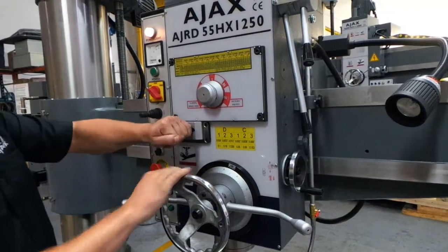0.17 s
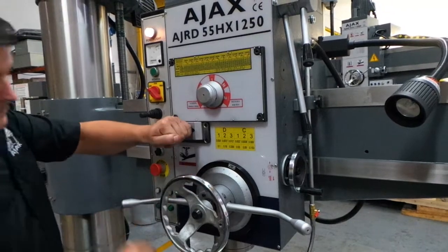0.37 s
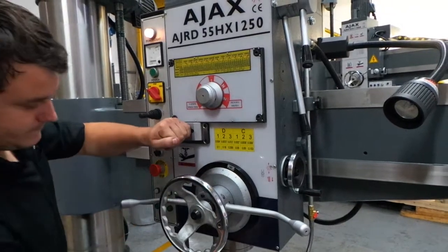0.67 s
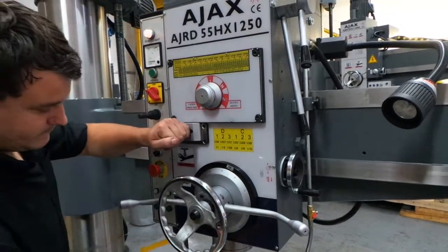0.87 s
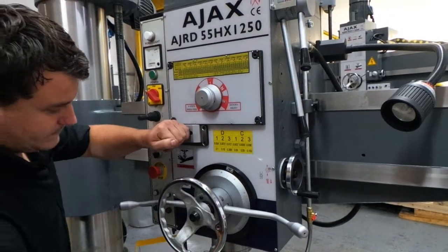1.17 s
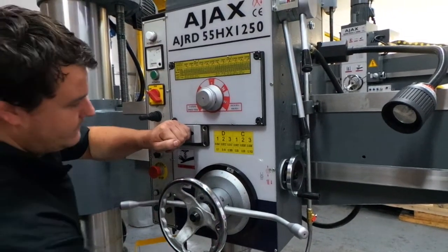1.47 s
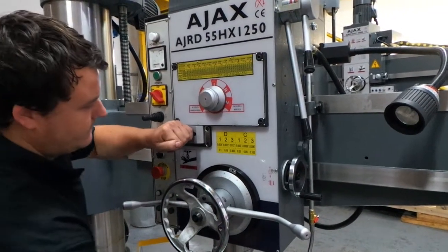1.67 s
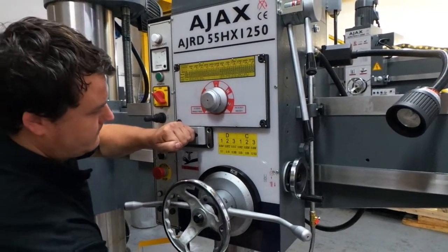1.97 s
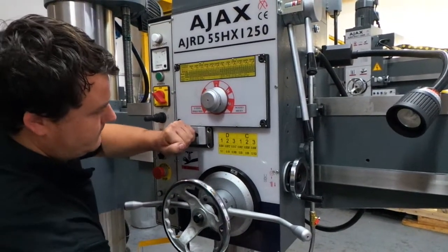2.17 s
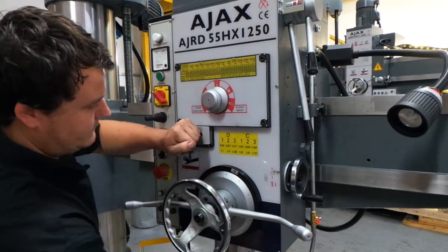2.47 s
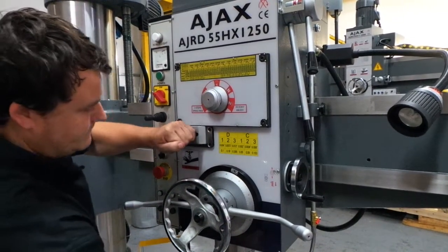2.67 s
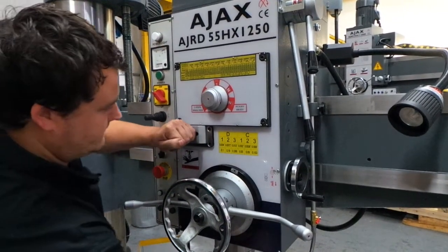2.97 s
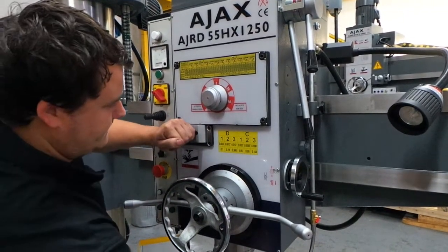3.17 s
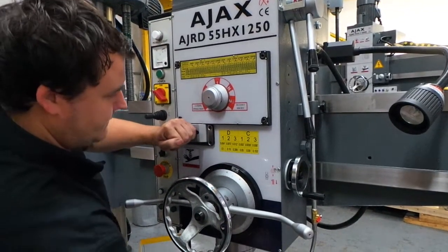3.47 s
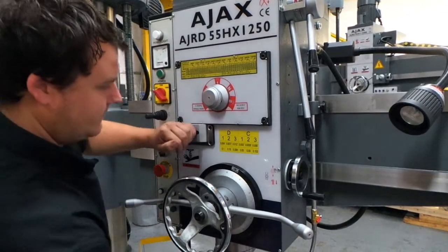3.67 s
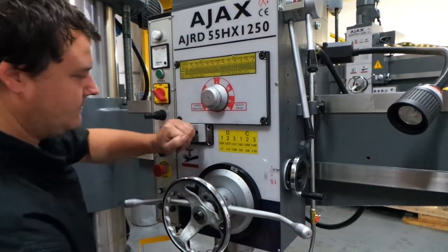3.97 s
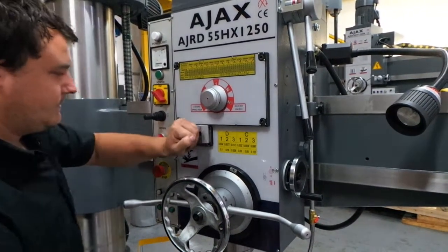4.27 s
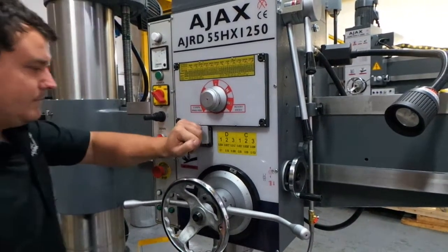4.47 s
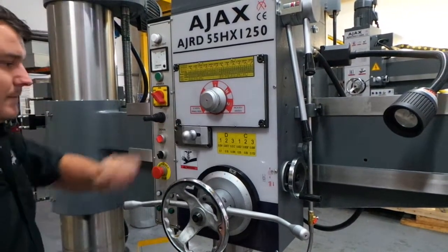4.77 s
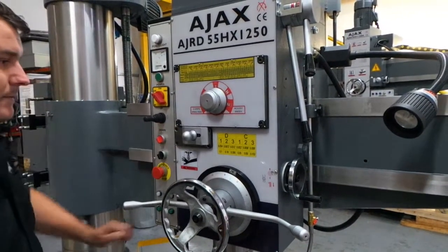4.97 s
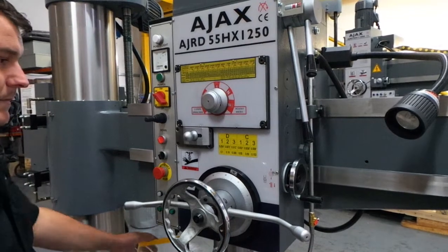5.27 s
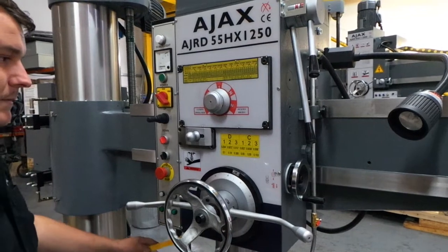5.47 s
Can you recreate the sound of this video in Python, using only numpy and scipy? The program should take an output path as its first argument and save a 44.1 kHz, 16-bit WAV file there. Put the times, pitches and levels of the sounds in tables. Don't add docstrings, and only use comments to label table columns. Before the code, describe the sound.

A large workshop hall with a faint, steady hiss of fans and pumps throughout. At 0 s the echo of a clack just before the start is dying away. From 0.8 to 1.15 s a cluster of dull, woody knocks and scuffs tumbles by, with small rough ticks and a very faint high jingle of loose steel around 1.0 s, cut by 1.3 s. Crisp catch ticks and grip nudges come at 1.7 s, more from 2.0 to 2.26 s. At 2.3 s a hard, bright steel snap bounces briefly; at 2.63 s a duller, weightier gear clunk follows. Each is very short, with over a second of dense hall echo. Faint metallic singing appears at 3.15 to 3.5 s, ticks at 3.65 s. Ticks at 4.12 s lead into a second sharp snap at 4.17 s and its echo. Weak bumps at 4.85 s, then soft board knocks around 5.43 s. Close single microphone, centred.

```python
import sys
import numpy as np
from scipy import signal
from scipy.fft import rfft, irfft, next_fast_len
from scipy.io import wavfile
from scipy.ndimage import uniform_filter1d

SR = 44100
rng = np.random.default_rng(int(sys.argv[2]) if len(sys.argv) > 2 else 0)


def wrap_up_sound(samples):
    columns = np.atleast_2d(samples).T
    tamed = np.clip(columns, -1, 1)
    steps = np.round(tamed * 32767).astype(np.int16)
    wavfile.write(sys.argv[1], SR, steps)


def elevation(decibels):
    levels = np.asarray(decibels, float)
    return 10 ** (levels / 20)


N = 247070
LEAD_S = 0.4
LEAD = round(LEAD_S * SR)
M = N + LEAD
SIZE = next_fast_len(M + 2 * SR)
HZ = np.maximum(np.arange(SIZE // 2 + 1) * SR / SIZE, 1)
SHORT = 2 ** 14
SHORT_HZ = np.maximum(np.arange(SHORT // 2 + 1) * SR / SHORT, 1)


def rms_one(x):
    return x / np.sqrt(np.mean(x ** 2) + 1e-20)


def at_hz(points, hz):
    table = np.array(points)
    return np.interp(np.log(hz), np.log(table[:, 0]), table[:, 1])


def in_time(rows):
    return np.interp(np.arange(M) / SR - LEAD_S, *np.transpose(rows))


def band(x, low_hz, high_hz, order=2):
    return signal.sosfilt(signal.butter(order, [low_hz, high_hz], "band", fs=SR, output="sos"), x)


def ring(clicks, hz, t60):
    decay = elevation(-60 / (t60 * SR))
    turn = 2 * np.pi * hz / SR
    return signal.lfilter([0, np.sin(turn)], [1, -2 * decay * np.cos(turn), decay ** 2], clicks + 1e-18)


def burst(length_s, rise):
    t = np.arange(SR // 4) / SR / max(length_s, 1e-4)
    contacts = rng.standard_normal(len(t)) * rng.exponential(1, len(t))
    grains = contacts * (1 - np.exp(-t / rise)) * np.exp(-2 * t)
    return grains / np.sqrt(np.sum(grains ** 2))


def add(out, s, sound):
    at = round(s * SR) + LEAD
    out[at:at + len(sound)] += sound[:len(out) - at]


# (frequency [Hz], level per Hz [dB])
PLANT_COLOUR = [(12, -49.5), (20, -15), (103, -3.5), (128, -8.5), (189, -0.5), (337, -8.5), (387, -8),
                (555, -8.5), (638, -7.5), (733, -9), (1140, -7.5), (2160, -3.5), (3180, -20), (11700, -31),
                (15000, -34)]
# (time [s], level [dB])
PLANT_LEVEL = [(0, -54), (1.2, -55), (1.5, -57.5), (1.9, -53), (3.2, -52.5), (3.9, -54), (5.6, -55)]


def plant():
    spectrum = rfft(rng.standard_normal(SIZE)) * elevation(at_hz(PLANT_COLOUR, HZ))
    noise = irfft(spectrum, SIZE)[:M]
    return elevation(in_time(PLANT_LEVEL)) * rms_one(noise)


# (frequency [Hz], time [s])
HALL_DECAY = [(100, 1.22), (250, 0.98), (500, 1.26), (1000, 1.27), (2000, 1.14), (4000, 1.174),
              (7000, 1.05), (12000, 0.45)]


def hall():
    build_s = 0.002
    linger_db, linger_times = -23.5, 2.6
    t = np.arange(2 * SR) / SR
    white = rng.standard_normal((2, len(t)))
    edges_hz = 30 * 2 ** np.arange(0, 9.6, 0.5)
    out = np.zeros(len(t))
    for k, (low, high) in enumerate(zip(edges_hz, edges_hz[1:])):
        fall_db = -60 * t / at_hz(HALL_DECAY, np.sqrt(low * high))
        fall = np.hypot(elevation(fall_db), elevation(linger_db + fall_db / linger_times))
        out += band(white[k % 2], low, high) * fall
    return rfft(out * (1 - np.exp(-t / build_s)), SIZE)


# (frequency [Hz], width [Hz], level [dB])
JINGLE_NOTES = [(5580, 80, 2), (6400, 200, -1), (8877, 110, 2), (9636, 130, -8), (11040, 120, -14),
                (12600, 500, -6), (13510, 130, -6)]


def jingle():
    peak_s, stop_s, top_db = 1.035, 1.32, -68
    rise_db_per_s, fall_db_per_s, stop_db_per_s = 200, 60, 300
    white = rng.standard_normal(M)
    lines = elevation(0.5) * rms_one(band(white, 4500, 14000))
    for hz, width_hz, db in JINGLE_NOTES:
        t60 = 2.2 / width_hz
        lines += elevation(db) * rms_one(ring(ring(white, hz, t60), hz, t60))
    t = np.arange(M) / SR - LEAD_S
    shake_db = top_db - np.maximum(rise_db_per_s * (peak_s - t), fall_db_per_s * (t - peak_s))
    return elevation(shake_db - stop_db_per_s * np.maximum(t - stop_s, 0)) * lines


# (time [s], peak level [dB], pitch [Hz])
ROUGH_TICKS = [(0.859, -45, 2330), (0.9175, -39, 2900), (0.928, -36, 2020), (0.971, -49, 2000),
               (1.0744, -48, 1670), (1.52, -54, 2200), (4.1222, -30, 2360)]
# (time [s], peak level [dB], pitch [Hz])
CLEAR_TICKS = [(1.6915, -27.5, 2650), (1.6975, -33, 2750), (1.7074, -39, 2940), (1.776, -45, 1750),
               (2.2531, -30, 2220), (2.2577, -24, 2360), (3.642, -36.5, 2563), (3.655, -42, 1670),
               (4.113, -40, 1900), (4.118, -35, 2370)]
# (time [s], peak level [dB], pitch [Hz])
SLIDING_TICKS = [(.875, -43, 1400), (.94, -41, 1700), (1.0, -44, 1600), (1.7, -43, 1900), (2.02, -32, 1800),
                 (5.429, -45, 1500)]
# (time [s], level [dB], pitch [Hz], length [s])
SINGING_PART = [(2.095, -43.5, 1150, 0.014), (2.115, -39, 1150, 0.019), (3.155, -37, 1155, 0.079),
                (3.40, -44, 1152, 0.034), (3.435, -42, 1144, .03), (3.5, -46, 1170, 0.035)]
# (times its pitch [ratio], level [dB])
TICK_OVERTONES = [(1.45, -15), (2.05, -14)]


def ticks():
    out = np.zeros(M)
    # (table, length [s], edge level [dB], edge top [Hz], share of length spent swelling)
    kinds = [(ROUGH_TICKS, 0.004, 23, 4600, 0.04),
             (CLEAR_TICKS, 0.004, 11.3, 4600, 0.04),
             (SLIDING_TICKS, 0.016, 23.5, 2100, 0.8)]
    for rows, length_s, edge_db, edge_hz, rise in kinds:
        for s, peak_db, hz in rows:
            edge = band(burst(3.5 * length_s, rise), 900, edge_hz, order=1)
            touch = burst(length_s, rise)
            note = ring(touch, hz, 0.012)
            for times, db in TICK_OVERTONES:
                note += elevation(db) * ring(touch, times * hz, 0.013)
            add(out, s, elevation(peak_db + 0.5) * band(note + elevation(edge_db) * edge, 580, 6200))
    for s, db, hz, length_s in SINGING_PART:
        song = ring(burst(length_s, 0.4), hz, 0.08)
        add(out, s, elevation(db) * band(song, 0.64 * hz, 1.1 * hz))
    return out


# (time [s], peak level [dB], pitch [Hz])
BOARD_KNOCKS = [(0.788, -33, 790), (0.807, -38, 324), (0.864, -28, 700), (0.890, -22.5, 540),
                (0.926, -19.5, 536), (0.930, -27, 800), (0.948, -32, 304), (0.964, -29, 760),
                (1.019, -35, 826), (1.061, -25, 620), (1.087, -33, 310), (1.134, -44, 301),
                (5.419, -35, 780), (5.439, -29, 525), (5.452, -41, 298), (5.539, -45, 802)]
# (time [s], peak level [dB], pitch [Hz])
GRIP_NUDGES = [(1.694, -27.5, 500), (1.698, -32, 1050), (1.718, -31, 495), (1.78, -44, 509),
               (1.957, -45.5, 503), (2.046, -29, 600), (2.058, -31, 300), (2.10, -38, 480),
               (2.136, -39, 471.5), (2.169, -33, 240), (2.256, -33, 1074), (4.1125, -32, 1300),
               (4.124, -32, 503), (4.839, -39.5, 280), (4.895, -37, 207)]
# (frequency [Hz], level [dB], time to drop 60 dB [s])
BOARD_MODES = [(118, -10, .07), (190.5, -5, 0.077), (260, -7.5, 0.063), (306, -2.5, 0.13),
               (395, -11.5, 0.023)]


def knocks():
    out = np.zeros(M)
    boom_lag = 0.3
    # (table, length [s], boom level [dB])
    for rows, length_s, boom_db in [(BOARD_KNOCKS, 0.022, -4.5), (GRIP_NUDGES, 0.014, -10.5)]:
        for s, peak_db, hz in rows:
            scuff = burst(length_s, 0.13)
            push = burst(1.5 * length_s, 0.63)
            cluster = ring(scuff, hz, 0.043) - 0.52 * ring(scuff, 1.4 * hz, 0.038)
            cluster += 0.3 * ring(scuff, 1.9 * hz, 0.025) - 0.5 * ring(scuff, 0.64 * hz, 0.023)
            rubbing = band(burst(2.2 * length_s, 0.15), 400, 1200, order=1)
            boom = np.zeros(len(push))
            for j, (mode_hz, db, t60) in enumerate(BOARD_MODES):
                boom += (-1) ** j * elevation(db) * ring(push, mode_hz, t60)
            board_db = boom_db - boom_lag * (peak_db + 30)
            knock = cluster + elevation(24) * rubbing + elevation(board_db) * boom
            add(out, s, elevation(peak_db - 4.5) * band(knock, 80, 3000))
    return out


# (frequency [Hz], time to drop 60 dB [s], first snap [dB], gear clunk [dB], second snap [dB])
BLOCK_MODES = [(262, 0.063, -31, -5, -24.5), (475, 0.038, -28.5, -18.5, -31), (727, 0.029, -16, -9.5, -15),
               (850, 0.024, -18, -13, -17), (1084, 0.015, -14.5, -3.5, -16.5),
               (1250, 0.027, -18.5, -3.5, -11), (1450, 0.017, -9.5, -3, -7.5),
               (2020, 0.019, -10, -7, -12.5), (2393, 0.015, -3.5, -8, -0.5), (2880, 0.017, -13, -17.5, -11),
               (3220, 0.015, -16.5, -11, -19), (3700, 0.012, -21, -1, -16),
               (4570, 0.016, -16.5, -20.5, -11), (5300, .013, -24.5, -17, -20),
               (5510, 0.011, -13.5, -24, -13.5), (6540, 0.0086, -20, -17, -15.5)]


def block_ring(contact, kind):
    out = np.zeros(len(contact))
    for j, mode in enumerate(BLOCK_MODES):
        start = -elevation(-6.5) if kind == 3 else (-1) ** j
        out += start * elevation(mode[kind]) * ring(contact, mode[0], mode[1])
    return signal.lfilter([0.25, 0.5, 0.25], 1, out)


# (frequency [Hz], level per Hz [dB])
EARLIER_COLOUR = [(35, -48), (60, -22), (145, -6.5), (380, -8), (458, 1.5), (590, -6), (641, -10.5),
                  (842, -5), (1680, -15.5), (2120, -11.5), (3890, -19.5), (4410, -25), (9000, -40),
                  (11700, -70), (19800, -120)]
# (frequency [Hz], level per Hz [dB])
FIRST_SNAP_COLOUR = [(35, -48), (60, -25.5), (144, -7), (270, -17.5), (456, -1), (632, -9.5), (786, -1.5),
                     (916, -10), (1140, -2.5), (1270, -10), (1800, -9), (2290, -3.5), (3700, -14.5),
                     (4500, -13), (11000, -30), (14300, -63), (22000, -120)]
# (frequency [Hz], level per Hz [dB])
CLUNK_COLOUR = [(35, -60.5), (60, -29), (129, -7.5), (200, -13.5), (250, -1.5), (349, -9.5), (421, 0),
                (540, -6), (737, -3.5), (1520, -9.5), (1690, -14), (2260, -14), (3210, -20.5), (3870, -18),
                (8500, -35), (11000, -67), (18700, -120)]
# (frequency [Hz], level per Hz [dB])
SECOND_SNAP_COLOUR = [(35, -60.5), (60, -35), (130, -8.5), (246, -14.5), (499, -5.5), (533, -11),
                      (593, -9.5), (660, -4.5), (766, -2), (1100, -6), (1730, -7.5), (2430, -4.5),
                      (3580, -14), (4630, -11), (10000, -29.5), (13000, -64), (22000, -120)]
# (frequency [Hz], width [Hz], then the boost for each of the four clacks [dB])
CASING_MODES = [(154.3, 32, 3, 0, 6.8, 2.5), (255, 30, 2.7, 2, 2, 0), (446, 18, 7.8, 4, 8.6, 4),
                (590, 30, 4, 1, 5.5, 10.5), (722, 20, 8, 6, 6.5, 11), (805, 36, 3, 7, 5.5, 5.5),
                (1150, 38, 6.5, 4, 7.5, 2), (1476, 80, 2.3, 10.5, 3, 2.5), (2196, 170, 1.8, 3.5, 2.6, 4),
                (2393, 80, 2.2, 1.5, 3.3, 3.5), (2904, 60, 2, 5, 1.2, 5), (3945, 140, 7.2, -1, 7, 2),
                (4640, 100, 2, -0.5, 2.2, -5)]


def casing_and_hall(k, reflections):
    colours = EARLIER_COLOUR, FIRST_SNAP_COLOUR, CLUNK_COLOUR, SECOND_SNAP_COLOUR
    gain = elevation(at_hz(colours[k], SHORT_HZ))
    for hz, width_hz, *boost_db in CASING_MODES:
        gain = gain * elevation(boost_db[k] / (1 + (2 * (SHORT_HZ - hz) / width_hz) ** 2))
    cepstrum = irfft(np.log(gain), SHORT)
    cepstrum[1:SHORT // 2] *= 2
    cepstrum[SHORT // 2 + 1:] = 0
    casing = irfft(np.exp(rfft(cepstrum)))
    tail = irfft(rfft(casing, SIZE) * reflections, SIZE)[:2 * SR]
    return tail / np.sqrt(np.mean(tail[:SR // 10] ** 2))


# (time [s], hall level [dB], crack level [dB], loss of the bounces [dB per ms])
CLACK_EVENTS = [
    (-0.20, -27.7, -10, 2.0),
    (2.3050, -29, -7, .6),
    (2.6288, -25.5, -10, 2.6),
    (4.1684, -28.5, -3, 2.2),
]


def clacks(reflections):
    out = np.zeros(M)
    bounce_s = 0.0018 * np.arange(1, 5) ** 1.55
    crack_s = 0.004
    for k, (s, hall_db, crack_db, loss_db) in enumerate(CLACK_EVENTS):
        kind = (3, 2, 3, 4)[k]
        contact = np.zeros(SR // 4)
        contact[0] = elevation(1.0)
        contact[(bounce_s * SR).astype(int)] = elevation(-4 - loss_db * bounce_s * 1e3)
        if k == 2:
            contact = np.roll(contact, round(0.00045 * SR))
            contact[0] = -elevation(-8)
        contact = band(contact, 350, 5000, order=1)
        crack_top = 0.25 if kind == 3 else 0.95
        crack = band(burst(crack_s, 0.065), 3400, 7800)
        crack += crack_top * band(burst(crack_s, 0.05), 10300, 14800)
        add(out, s, block_ring(contact, kind) + elevation(crack_db) * crack)
        add(out, s, elevation(hall_db) * casing_and_hall(k, reflections))
    return out


def scene():
    reflections = hall()
    small = knocks() + ticks()
    small_echo = elevation(-42) * irfft(rfft(small, SIZE) * reflections, SIZE)[:M]
    mix = plant() + jingle() + small + small_echo + clacks(reflections)
    return np.tile(mix[LEAD:], (2, 1))


# (frequency [Hz], level under the whole [dB])
LOST_BELOW = [(6000, -78), (8500, -64), (11000, -58), (14500, -56), (15000, -34)]


def starve(x):
    hz, _, lines = signal.stft(x, SR, nperseg=2048, noverlap=1024)
    power = abs(lines) ** 2
    whole = np.sqrt(np.sum(power, axis=0))
    near = np.sqrt(uniform_filter1d(power, size=2, axis=0))
    kept = near > whole * elevation(at_hz(LOST_BELOW, np.maximum(hz, 1)))[:, None]
    return signal.istft(lines * kept, SR, nperseg=2048, noverlap=1024)[1][:N]


def low_pass(x):
    return signal.sosfilt(signal.butter(12, 15480, fs=SR, output="sos"), x)


def record(dry):
    mono = starve(np.clip(dry[0], -1, 1))
    return low_pass(np.tile(mono, (2, 1)))


dry = scene()
out = record(dry)
wrap_up_sound(out)
```